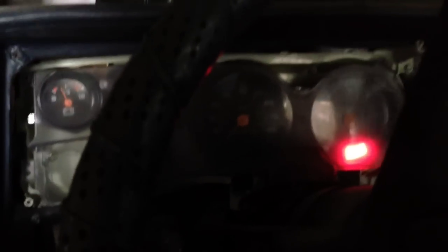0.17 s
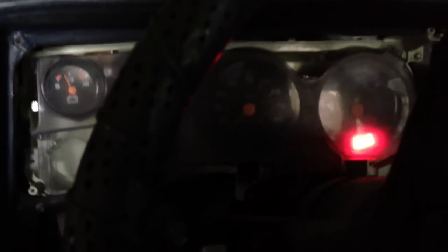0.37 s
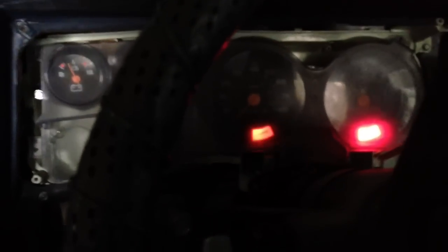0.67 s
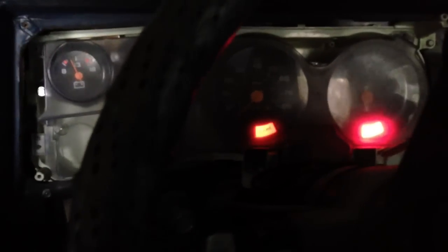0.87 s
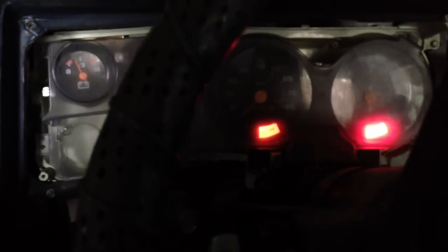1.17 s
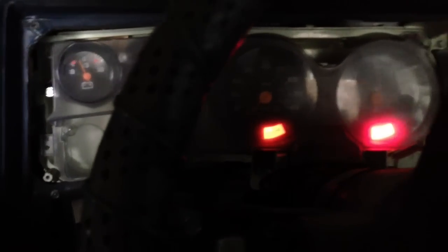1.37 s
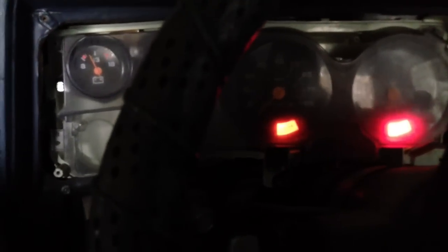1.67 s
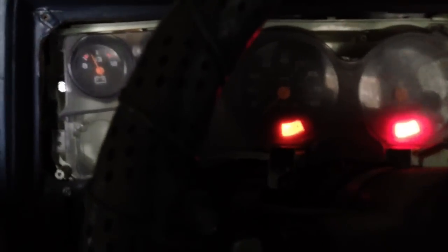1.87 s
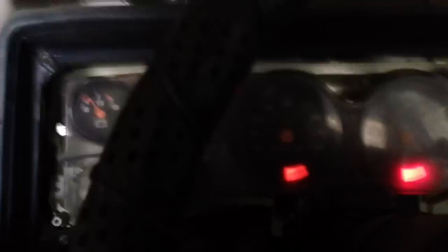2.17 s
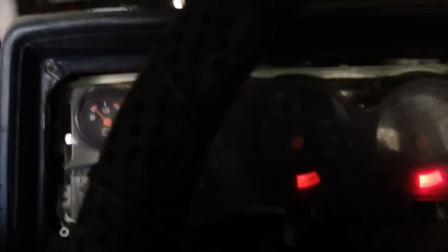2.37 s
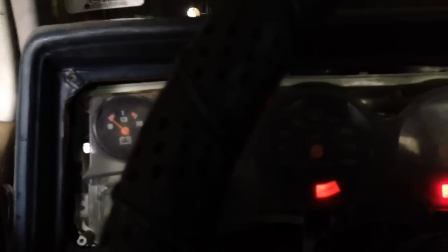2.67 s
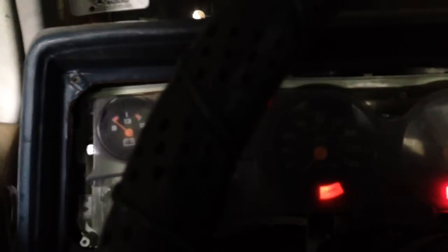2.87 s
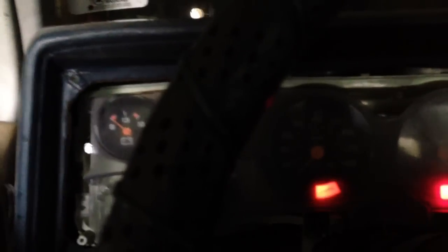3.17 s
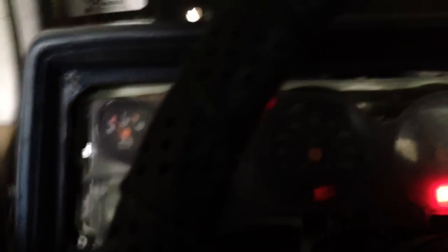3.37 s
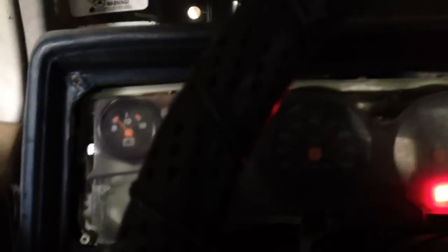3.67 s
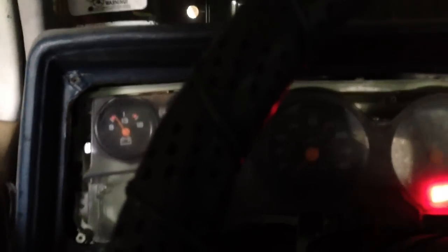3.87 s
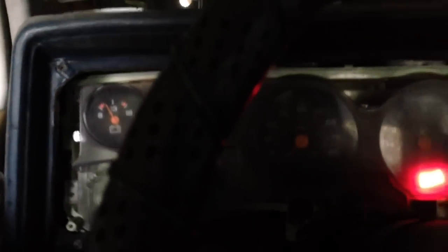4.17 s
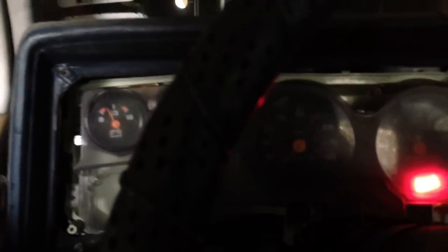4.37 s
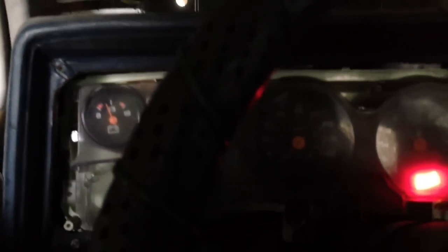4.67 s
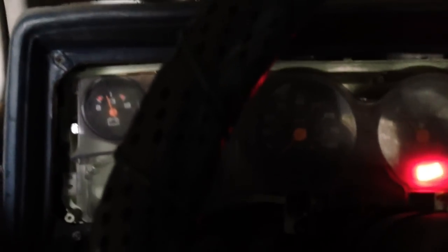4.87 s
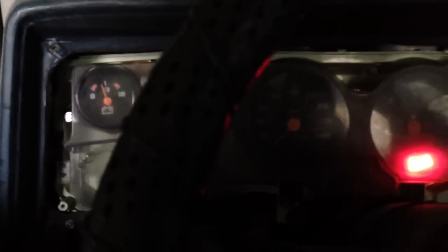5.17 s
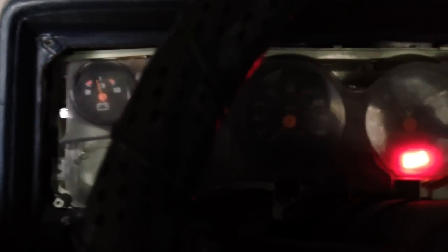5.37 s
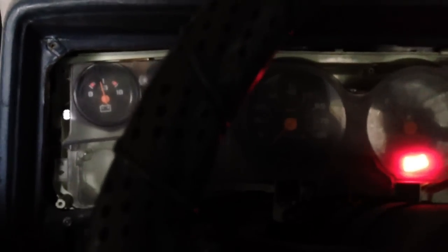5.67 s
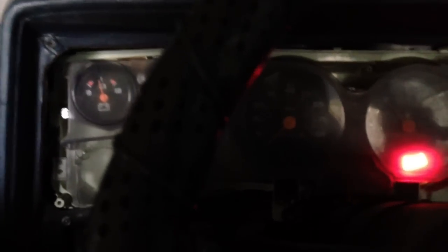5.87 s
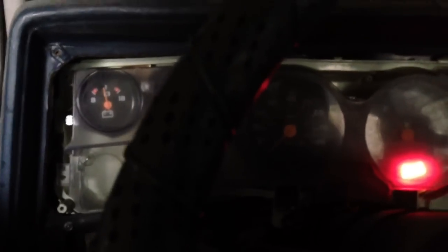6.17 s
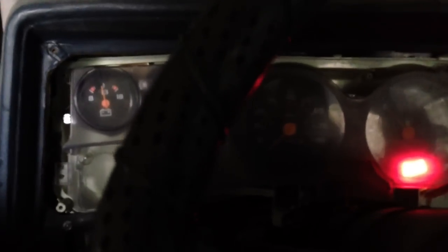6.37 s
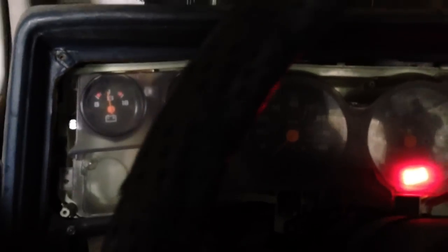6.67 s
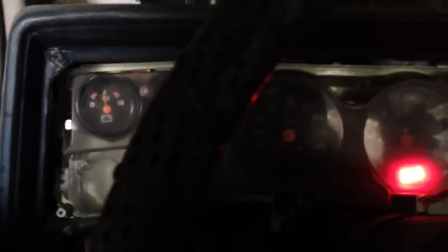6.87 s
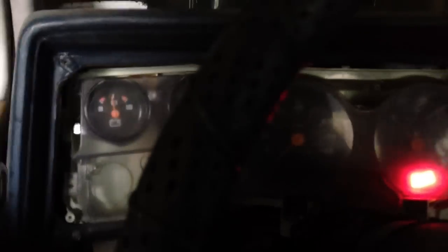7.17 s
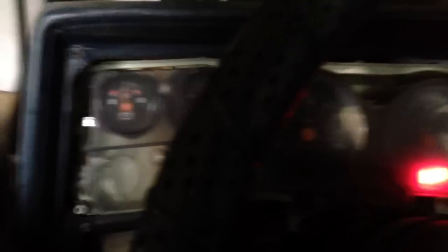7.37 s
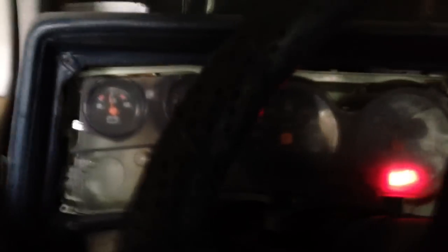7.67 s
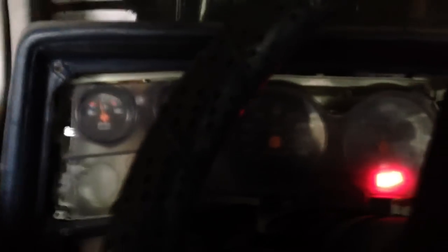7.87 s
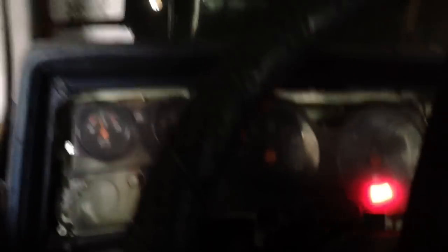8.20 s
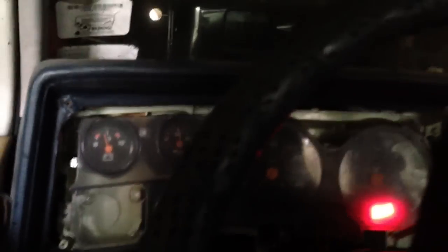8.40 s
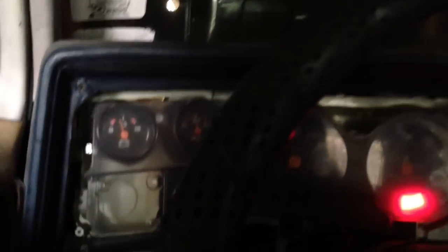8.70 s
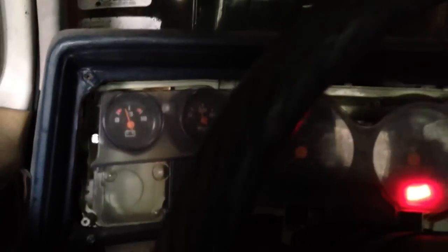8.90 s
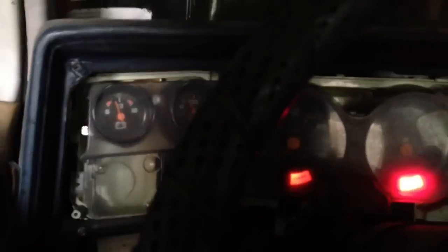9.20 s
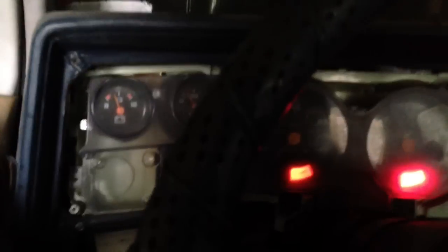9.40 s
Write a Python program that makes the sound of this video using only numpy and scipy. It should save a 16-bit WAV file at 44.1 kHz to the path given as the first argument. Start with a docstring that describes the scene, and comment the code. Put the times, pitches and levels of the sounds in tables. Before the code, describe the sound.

Close in the cabin of an old car, over a very faint low outdoor murmur. At 0.5-0.9 s a pedal linkage scrapes and raps the floor pan with a dull boom; lock clicks follow at 0.75 and 1.35 s, tiny key clinks around 1.6-1.8 s and a firmer click at 2.03 s. From 2.1 to 3.4 s the starter grinds harshly, bright metallic clashing in uneven swells over a low growl, biting again at 2.9 and 3.25 s. The V8 catches around 3.5 s with belt squeaks, then surges at about 3.8, 4.6, 5.6 and 6.1 s, booming, clattering and hissing, sagging between. It weakens; at 7.0 s it spits back with a loud bark and tinny clank. Slowing chuffs, rattles and thumps run down until about 8.3 s. Quiet returns, then a pedal scrape and knock at 8.8-9.06 s, and only murmur.

```python
"""Inside an old car: a pedal is pumped, the key clicks round and the starter grinds harshly on the ring gear.
The V8 catches, surges four times, spits back with a clank, runs down in chuffs and shudders to a stop.
The pedal is pressed once more in the quiet cabin.
Knocks, scrapes and rushing air are shaped noise and decaying tones; a running count of gear teeth drives
the starter, and a running count of firings drives the engine."""
import sys
import numpy as np
from scipy import signal
from scipy.fft import rfft, irfft, next_fast_len
from scipy.io import wavfile
from scipy.ndimage import uniform_filter1d, minimum_filter1d, map_coordinates

SR = 44100
rng = np.random.default_rng(int(sys.argv[2]) if len(sys.argv) > 2 else 0)


def master(y):
    """Save y as 16-bit WAV."""
    cut = np.clip(np.atleast_2d(y).T, -1, 1)
    pcm = np.round(cut * 32767)  # scale
    wavfile.write(sys.argv[1], SR, pcm.astype(np.int16))


N = 420713

# colour of rushing air: (frequency [Hz], level [dB])
HISS_SPECTRUM = [(2350, -22), (4000, -1), (5100, 0), (8550, -9), (12900, -12), (14700, -15), (15500, -18)]
# the engine spits back: (time [s], level [dB])
BACKFIRES = [(7.0054, -8.5)]
# stabs of the throttle:
# (fully open [s], let go [s], depth [1 = a firm stab], top speed [firings per second])
THROTTLE_STABS = [(3.74, 3.814, 1.236, 116), (4.469, 4.641, 1.006, 106), (5.501, 5.594, 1.02, 84),
                  (6.031, 6.17, 0.99, 101)]
# the engine between the stabs: (time [s], throttle opening [0-1], strength of the burn [dB])
LIGHT_FOOT = [(3.48, 0.58, -3.5), (3.7, 0.54, 2), (3.95, 0.06, -1), (4.22, 0, -1.5), (5.1, 0.17, -1),
              (5.8, .04, 0.2), (6.4, 0.34, 1.5), (6.95, 0.58, 2), (7.42, 0.62, -2.5), (7.52, 0, 3.5)]


def amp(db):
    """Turn decibels into a gain."""
    return 10 ** (np.asarray(db) / 20)


def unit(x):
    """Scale x to an average (rms) strength of 1."""
    return x / np.sqrt(np.mean(x ** 2) + 1e-20)


def clock():
    """Time of every sample, in seconds."""
    return np.arange(N) / SR


def curves(rows):
    """Join the table's points with straight lines: one curve for each column after the time."""
    times, *columns = np.transpose(rows)
    return [np.interp(clock(), times, column) for column in columns]


def gate(start, stop, rise, fall):
    """Fully on between two times, with curved ramps before and after them."""
    fade_in = np.clip(1 + (clock() - start) / rise, 0, 1) ** 2
    fade_out = np.clip(1 + (stop - clock()) / fall, 0, 1) ** 2
    return fade_in * fade_out


def wobble(rate):
    """A smooth random curve through `rate` random points a second."""
    times = np.arange(0, N / SR, 1 / (6 * rate))
    points = rng.standard_normal(int(N * rate / SR) + 4)
    return np.interp(clock(), times, map_coordinates(points, [times * rate]))


def noise():
    """White noise."""
    return rng.standard_normal(N)


def filtered(x, response):
    """Multiply the spectrum of x by a function of frequency."""
    size = next_fast_len(N + SR // 2)
    return irfft(rfft(x, size) * response(np.fft.rfftfreq(size, 1 / SR)), size)[:N]


def coloured(x, points):
    """Shape x with a (frequency [Hz], level [dB]) spectrum, then scale it to rms 1."""
    f, db = np.transpose(points)
    return unit(filtered(x, lambda hz: amp(np.interp(np.log(hz + 1), np.log(f + 1), db))))


def resonate(x, peaks):
    """Let x ring (frequency [Hz], width [Hz], level [dB]) resonances, then scale it to rms 1."""
    t = np.arange(SR // 4) / SR
    response = 0
    for hz, width, db in peaks:
        decay = np.exp(-np.pi * abs(width) * t)
        response = response + amp(db) * np.sqrt(abs(width)) * decay * np.cos(2 * np.pi * hz * t)
    return unit(signal.fftconvolve(x, np.heaviside(t, .5) * response)[:N])


def burst(rise, t60):
    """Half a second of loudness shape: a quick swell, then a decay by 60 dB every t60 seconds; peak 1."""
    t = np.arange(SR // 2) / SR
    shape = (1 - np.exp(-t / abs(rise))) * np.exp(-np.log(1000) * t / abs(t60))
    return shape / shape.max()


def ring(modes, rise):
    """A struck object's fading tones, each at a slightly random strength for every blow."""
    t = np.arange(SR // 2) / SR
    return sum(amp(db + rng.normal(0, 1.3)) * burst(rise, t60) * np.sin(2 * np.pi * hz * t)
               for hz, db, t60 in modes)


def place(sounds):
    """Add (time, sound) pairs together on one track."""
    track = np.zeros(N + SR)
    for s, sound in sounds:
        track[max(round(s * SR), 0):][:len(sound)] += sound
    return track[:N]


def strokes(turns, scatter_db):
    """One click of uneven size whenever the count of turns passes a whole number."""
    return np.diff(np.floor(turns), prepend=0) * amp(scatter_db * noise())


def patchy(x, depth_db):
    """Give x short-lived strands of extra and missing strength."""
    spectrum = signal.stft(x, nperseg=1024)[2]
    field = uniform_filter1d(rng.standard_normal(spectrum.shape), size=3, axis=0)  # blur over frequency
    field = uniform_filter1d(field, size=5, axis=1)  # blur over time
    return signal.istft(spectrum * amp(depth_db * unit(field)), nperseg=1024)[1][:N]


def squeal(hz, spread):
    """A rubbing tone whose pitch and strength stagger, at rms 1."""
    pitch = hz * (1 + spread * wobble(450))
    return unit(amp(3 * wobble(90)) * np.sin(2 * np.pi * np.cumsum(pitch / SR)))


def cabin():
    """A faint outdoor murmur of shaped noise, and a faint low hum before the engine catches."""
    # colour of the murmur: (frequency [Hz], level [dB])
    quiet_spectrum = [(18, -62.5), (30, -39), (102, -12.5), (126, -5.5), (202, 1), (230, -5.5), (315, -6),
                      (479, -21), (606, -7.5), (691, -18.5), (921, -18), (1050, -21.5), (3490, -25.5),
                      (4540, -26), (15500, -30.5)]
    murmur = amp(-57.0 + 0.99 * wobble(13)) * coloured(noise(), quiet_spectrum)
    hum_hz = 137 + 1.3 * wobble(7.0)
    hum = gate(0.74, 3.1, rise=.2, fall=0.045) * np.sin(2 * np.pi * np.cumsum(hum_hz) / SR)
    return murmur + amp(-58.5) * hum


def jingle():
    """Spare keys on the ring touch, and their metal rings in tiny clinks."""
    # the keys touch: (time [s], level [dB])
    touches = [(1.582, -44), (1.634, -48.5), (1.687, -48.5), (1.79, -55)]
    # tones of a spare key: (frequency [Hz], level [dB], 60 dB decay time [s])
    key_modes = [(3160, -4, 0.044), (3250, -11, .05), (6100, -8, 0.063), (8600, -6, 0.1), (9900, -8, 0.054),
                 (12200, -7, .07), (15100, -4, .06)]
    return place((s, amp(db) * ring(key_modes, rise=0.0016)) for s, db in touches)


def key():
    """Small lock parts slide and snap as clicks of noise, and ring the metal lock barrel."""
    # key and lock clicks: (time [s], level [dB], barrel ring relative to the click's level [dB])
    clicks = [(0.753, -26.5, -22), (1.3506, -29, -13), (1.4168, -41.5, -4.5), (1.584, -46, -28),
              (1.6372, -47, -20), (1.69, -36, -2), (1.977, -41.5, -12), (1.9984, -43, 7), (2.034, -20, -10),
              (2.0524, -44.5, -16)]
    # colour of a click: (frequency [Hz], level [dB])
    click_spectrum = [(530, -22), (900, -9.5), (1370, -6), (2820, -7.5), (4550, -5.5), (6050, -12),
                      (13300, -15.5), (14800, -25), (15500, -29)]
    # tones of the lock barrel: (frequency [Hz], level [dB], 60 dB decay time [s])
    barrel_modes = [(775, 6, .07), (710, -3, .06), (1000, -4, .04), (2420, -6, 0.067), (6045, -26, .07)]
    slide = place((s - .012, amp(db - 27) * burst(0.01, 0.13)) for s, db, ring_db in clicks)
    snap_shape = burst(0.00071, 0.019) + amp(-16.5) * burst(0.0026, .1)  # a sharp tick and a faint tail
    snap = place((s, amp(db - 8) * snap_shape) for s, db, ring_db in clicks)
    barrel = place((s, amp(db + ring_db - 5.5) * ring(barrel_modes, rise=0.00066))
                   for s, db, ring_db in clicks)
    return (slide + snap) * coloured(patchy(noise(), depth_db=-2.0), click_spectrum) + barrel


def pedal():
    """The linkage takes up its slack and scrapes; the arm raps the floor pan, which booms on for a moment."""
    # linkage scrapes: (time [s], level [dB], hiss relative to that level [dB], 60 dB decay time [s])
    scrapes = [(0.482, -27.5, -37, 0.1), (.777, -24, -17, 0.11), (.792, -41, -25, 0.28),
               (0.902, -35, -19.5, 0.053), (8.82, -32, -20, 0.091), (8.94, -23, -17.5, 0.14),
               (9.057, -35.5, -22.5, 0.04)]
    # colour of a scrape: (frequency [Hz], level [dB])
    scrape_spectrum = [(100, -45), (300, -8), (700, 7.5), (1200, -10), (1900, 1), (2800, 0), (4500, -7),
                       (6500, -27), (15000, -49)]
    # the pedal meets the floor: (time [s], thud level [dB], rap level [dB])
    landings = [(0.494, -37, -61), (0.794, -26.5, -27.5), (0.903, -49, -41), (8.96, -31, -27),
                (9.059, -46, -49)]
    # colour of the floor pan's thud: (frequency [Hz], level [dB])
    floor_spectrum = [(30, -65), (60, -27), (110, -11.5), (185, 9.5), (290, -2.5), (380, -5), (700, -49)]
    # resonances of the pedal arm: (frequency [Hz], width [Hz], level [dB])
    arm_peaks = [(376, 31, -4), (474, 25, 12), (592, 28, 4), (690, 41, -8), (1040, 150, -26)]
    thud_t60_s, rap_t60_s = .27, .18
    scrape = place((s, amp(db - 9.5) * burst(0.0034, t60)) for s, db, hiss_db, t60 in scrapes)
    slack = place((s - .012, amp(db - 21) * burst(0.011, 0.12)) for s, db, hiss_db, t60 in scrapes)
    hiss = place((s, amp(db + hiss_db - 5.0) * burst(.003, t60)) for s, db, hiss_db, t60 in scrapes)
    thud = place((s, amp(db) * burst(0.0037, thud_t60_s)) for s, db, rap_db in landings)
    rap = place((s, amp(rap_db) * burst(.004, rap_t60_s)) for s, db, rap_db in landings)
    linkage = (scrape + slack) * coloured(patchy(noise(), depth_db=3.0), scrape_spectrum)
    linkage = linkage + hiss * coloured(noise(), HISS_SPECTRUM)
    return linkage + thud * coloured(noise(), floor_spectrum) + rap * resonate(noise(), arm_peaks)


def chirps():
    """The belt slips on its pulley and rubs out short, unsteady squeaks."""
    # the belt slips: (start [s], end [s], pitch [Hz], level [dB])
    slips = [(3.55, 3.574, 2290, -31), (3.68, 3.798, 2276, -26.5), (3.753, 3.859, 2810, -23.5),
             (6.187, 6.283, 2160, -33), (7.329, 7.369, 2580, -31), (7.41, 7.459, 2410, -32.5),
             (7.831, 7.852, 2240, -33)]
    return sum(amp(db) * gate(start, stop, rise=0.051, fall=0.024) * squeal(hz, spread=0.031)
               for start, stop, hz, db in slips)


def kicks():
    """Jolts, misfires and the final shudder make the body boom briefly: a fading low tone with dull noise."""
    # dull thumps through the body: (time [s], level [dB], pitch [Hz], 60 dB decay time [s])
    thumps = [(0.0, -29, 168, 0.18), (2.757, -21.5, 329, 0.099), (2.807, -21.5, 289, .09),
              (3.058, -27, 331.4, 0.087), (4.46, -19, 152, .1), (4.618, -15, 153, .05),
              (4.685, -14.5, 165, 0.03), (5.505, -15.5, 149, 0.125), (7.024, -9.5, 190.7, 0.1),
              (7.109, -11, 175.5, 0.053), (7.602, -23, 270, 0.31), (7.647, -17, 219, 0.17),
              (7.838, -24, 266, 0.23), (7.874, -17, 279, 0.18), (7.96, -18, 202, .28),
              (8.106, -23, 170, 0.14), (8.303, -15, 196.5, .25), (8.785, -35.5, 134, 0.19)]
    rise_s = 0.0057
    shake_spectrum = [(30, -53.5), (65, -22.5), (125, 1.5), (280, 3.5), (380, -14.5), (700, -18),
                      (2000, -25.5), (6000, -51.5)]  # (frequency [Hz], level [dB])
    thuds = place((s, amp(db) * ring([(hz, 0, t60)], rise_s)) for s, db, hz, t60 in thumps)
    shake = amp(-9.5) * place((s, amp(db) * burst(rise_s, t60)) for s, db, hz, t60 in thumps)
    return thuds + shake * coloured(noise(), shake_spectrum)


def chuffs():
    """The intake gasps twice as the throttle is stabbed once more, then the coasting cylinders let their air go
    one by one; each puff of hiss is joined by a loose rattle."""
    # two gasps at the intake, then the last compressions: (time [s], rattle level [dB], hiss level [dB], 60 dB
    # decay time [s])
    compressions = [(7.325, -41, -33, 0.3), (7.385, -47, -35, 0.19), (7.541, -35.5, -33.5, 0.41),
                    (7.605, -33, -32.5, 0.27), (7.651, -33.5, -56.5, 0.22), (7.803, -37, -36.5, 0.45),
                    (7.873, -30.5, -29.5, .23), (7.968, -34.5, -63.5, .2), (8.041, -37, -61, .12),
                    (8.106, -34.5, -43, 0.11), (8.18, -36, -55.5, 0.1), (8.25, -34, -51, 0.13),
                    (8.305, -42.5, -65.5, .14)]
    # colour of the rattle: (frequency [Hz], level [dB])
    rattle_spectrum = [(100, -40), (450, 0.5), (700, 3), (860, -6.5), (1050, -2.5), (1500, -6),
                       (2500, -1.5), (4000, -16), (6000, -21), (11000, -48.5)]
    rattle_rise_s, air_rise_s = .004, 0.0028
    body = place((s, amp(db) * (burst(rattle_rise_s, t60) + amp(-14.5) * burst(0.065, 0.35)))
                 for s, db, hiss_db, t60 in compressions)
    air = place((s, amp(hiss_db) * burst(air_rise_s, t60)) for s, db, hiss_db, t60 in compressions)
    rattle = body * coloured(patchy(noise(), depth_db=5.5), rattle_spectrum)
    return rattle + air * coloured(noise(), HISS_SPECTRUM)


def backfire():
    """A spit through the carburettor rings the air cleaner's tin lid, which lifts and lands once more."""
    # colour of the blast: (frequency [Hz], level [dB])
    bark_spectrum = [(180, -31.5), (300, -10.5), (700, -1.5), (970, -14), (1260, -6), (1550, -10),
                     (2000, -2.5), (2350, -17), (3000, -5.5), (4100, -16), (5000, -25), (10000, -46),
                     (15000, -67)]
    # tones of the lid: (frequency [Hz], level [dB], 60 dB decay time [s])
    lid_modes = [(1994, 6, 0.13), (1960, -8, .17), (3100, -0.5, 0.033), (2610, -13, 0.068)]
    blast = place((s, amp(db - 3.5) * burst(.006, 0.16)) for s, db in BACKFIRES)
    lid = place((s + 0.014, amp(db - 10.5) * ring(lid_modes, rise=0.016)) for s, db in BACKFIRES)
    # the landing rings only the first tone, and fades faster
    landing = place((s + 0.073, amp(db - 17.0) * ring(lid_modes[:1], rise=0.0072) * burst(0.0065, 0.17))
                    for s, db in BACKFIRES)
    return blast * coloured(noise(), bark_spectrum) + lid + landing


def starter():
    """Pinion teeth skid and hammer on the ring gear, which rings; the motor growls under the load."""
    # average rate at which the pinion teeth strike: (time [s], rate [Hz])
    tooth_rate = [(2.12, 272.8), (2.2, 180.4), (2.3, 217.7), (2.39, 260.6), (2.47, 177.4), (2.56, 178.8),
                  (2.68, 226), (2.8, 302), (3.2, 220)]
    # the pinion bites anew: (time [s], level [dB], 60 dB decay time [s])
    bite_times = [(2.109, -44, .15), (2.131, -32.5, 0.48), (2.8837, -7.5, 0.23), (3.254, -9.5, 0.2)]
    # ring gear resonances: (frequency [Hz], level [dB])
    gear_modes = [(1357, -41), (1604, -49), (1744, -34), (1922, -33), (2056, -39), (2207, -38.5),
                  (2681, -30.5), (2972, -42.5), (3235, -35.5), (3418, -41), (3747, -33.5), (4587, -34.5),
                  (4947, -37.5), (5270, -41.5), (5706, -36), (6385, -42), (6589, -43), (6858, -39.5),
                  (6993, -42)]
    # colours of the skidding teeth and of the motor's growl: (frequency [Hz], level [dB])
    clash_spectrum = [(40, -60), (150, -34), (450, -10.5), (700, -10), (1200, -6.5), (1800, 0), (2600, 1.5),
                      (3500, 0), (5500, 0), (6800, -6.5), (8500, -12.5), (11000, -15), (13000, -25),
                      (15500, -34.5)]
    growl_spectrum = [(25, -58.5), (60, -49.5), (110, -20), (180, 3), (310, -3.5), (400, -11), (500, 1),
                      (650, -23.5), (1200, -35.5)]
    # each compression loads the starter in a bell-shaped swell:
    # (peak time [s], gear clash level [dB], growl level [dB], standard deviation of the bell [s])
    loads = [(2.225, -12.5, -34.5, 0.11), (2.42, -11.5, -34.5, 0.11), (2.62, -11, -32, .06),
             (2.785, -11, -36, 0.055), (3.025, -11, -33.5, 0.047), (3.165, -20.5, -44, .02),
             (3.37, -19.5, -35.5, .035)]
    moan_db, moan_hz, moan_width_hz = -29.5, 177, 69  # the moan is loudest where the body resonates

    swells = [(np.exp(-.5 * ((clock() - s) / width) ** 2), clash_db, growl_db)
              for s, clash_db, growl_db, width in loads]
    # swells add as powers over a steady floor
    clash = np.sqrt(sum((amp(clash_db) * swell) ** 2 for swell, clash_db, growl_db in swells) + amp(-27) ** 2)
    strain = np.sqrt(sum((amp(growl_db) * swell) ** 2 for swell, clash_db, growl_db in swells)
                     + amp(-42.5) ** 2)
    strikes_hz = curves(tooth_rate)[0]
    turns = np.cumsum(strikes_hz * amp(.5 * wobble(130))) / SR  # one turn per tooth
    teeth = unit(strokes(turns, scatter_db=1.0))
    landing = np.exp(-(turns % 1) / 0.8)  # each tooth scrapes as it lands
    grind = unit(noise() * (2.4 + landing) * amp(1.4 * wobble(70)))
    on = gate(2.135, 3.41, rise=0.021, fall=.06)
    bites = place((s, amp(db) * burst(0.013, t60)) for s, db, t60 in bite_times)
    skid = coloured(patchy(grind, depth_db=3.0), clash_spectrum)  # the point of contact keeps moving
    gear = resonate(noise() + .4 * teeth, [(hz, 27, db) for hz, db in gear_modes])
    loaded = gate(2.15, 2.68, rise=0.064, fall=.3)  # the motor moans until the engine starts to help it round
    body = amp(moan_db) / np.hypot(1, 2 * (strikes_hz - moan_hz) / moan_width_hz)
    moan = loaded * body * unit(amp(2.5 * wobble(45)) * np.sin(2 * np.pi * turns))
    growl = (on * strain + amp(-24) * bites) * coloured(.5 * teeth + noise(), growl_spectrum)
    return (on * clash + bites) * (amp(-2.03) * skid + amp(-7.5) * gear) + growl + moan


def throttle():
    """How far the throttle stands open: quick stabs over a light foot."""
    open_s, close_s = 0.22, 0.14  # time taken to open and to close
    resting = curves(LIGHT_FOOT)[0]
    opening = resting
    for start, stop, depth, top in THROTTLE_STABS:
        ramp = np.interp(clock(), [start - open_s, start, stop, stop + close_s], [0, 1, 1, 0])
        opening = opening + ramp * (depth - resting)
    return opening


def speed():
    """Firings per second: each stab lifts the speed, which sags until the next one and at last runs down."""
    # the engine fades and stalls: (time [s], speed [firings per second])
    stall = [(6.419, 88.6), (6.8, 76), (7.0, 76), (7.12, 66.6), (7.402, 48), (8.0, 16.4)]
    sag_rate = 61  # firings per second before a stab
    pickup_s, carry_s = .115, .06  # speed picks up before full throttle and holds on after it
    turning = []
    for start, stop, depth, top in THROTTLE_STABS:
        turning += [(start - pickup_s, sag_rate), (stop, top), (stop + carry_s, top)]
    # the time between firings, not their rate, changes in straight lines
    return 1 / curves([(s, 1 / rate) for s, rate in turning + stall])[0]


def engine():
    """Uneven firings boom in the cabin, thud through the exhaust and rattle the valve gear; the intake hisses."""
    # strength of each firing round the firing order: one value per cylinder [dB]
    cylinder_db = [1, -1, -4.5, 1, 3, 0, 1.5, -2]
    # colours of the exhaust and of the valve gear: (frequency [Hz], level [dB])
    exhaust_spectrum = [(59, -42), (100, -24.5), (118, -5), (160, 2.5), (204, 1.5), (242, -4.5),
                        (343, -5.5), (392, -16), (459, -6), (512, -11.5), (810, -17), (903, -14),
                        (1070, -21), (1250, -24), (1800, -17), (2340, -50.5), (3960, -120)]
    clatter_spectrum = [(710, -31.5), (1200, -3.5), (1430, -5), (1570, -1.5), (2020, 3), (2240, 4.5),
                        (2420, 5.5), (2760, 3), (2910, -2), (3080, -4), (3270, -3), (5070, -11),
                        (9000, -48), (11700, -45.5), (19800, -120)]
    # resonances of the bulkhead: (frequency [Hz], width [Hz], level [dB])
    bulkhead_peaks = [(451, 13, 2), (933, 30, -6), (1064, 12, -5.5)]
    # the cabin's answer to the firing tone: (firing rate [Hz], level [dB])
    cabin_boom = [(50, -5), (62, -15.5), (73, 0), (82, -1), (92, -5), (112, -13)]
    # tones above the firing tone: (multiple of the firing rate, level relative to the exhaust [dB])
    tone_multiples = [(1.5, -18), (2, -7), (2.5, -10), (4, -15)]
    firing_spectrum = [(60, -4.5), (350, -9.5), (700, 1.5), (1500, -18.5)]  # (frequency [Hz], level [dB])
    rumble_spectrum = [(15, -28.5), (30, -14.5), (50, -12.5), (75, 4.5), (110, -0.5), (160, -11),
                       (400, -58.0)]  # (frequency [Hz], level [dB])
    lag_s = 0.022  # the engine answers the throttle a little later
    belt_hz, belt_hz_per_firing, belt_drift_hz = 2040, 5, 140  # the rasp rises with engine speed and drifts

    rate, opening, burn_db = speed(), throttle(), curves(LIGHT_FOOT)[1]
    load = np.interp(clock() - lag_s, clock(), opening)
    # a backfire shakes the whole engine
    spit = sum(gate(s + .015, s + .1, rise=.02, fall=0.36) for s, db in BACKFIRES)
    # each voice starts from its level with the throttle shut and gains with the throttle
    boom_db = -39 + 15 * np.minimum(load, 1) + 1.5 * burn_db + np.interp(rate, *np.transpose(cabin_boom))
    exhaust_db = -35.5 + 11 * load + burn_db + 10.5 * spit
    clatter_db = -42 + 14 * load + 5 * spit
    hiss_db = -48 + 16 * opening

    turns = np.cumsum(rate * amp(.08 * wobble(40))) / SR  # one turn per firing
    cylinder = amp(np.take(cylinder_db, turns.astype(int) % len(cylinder_db)))
    puff = unit(cylinder * np.exp(-(turns % 1) / .5))  # gas leaves in one puff per firing
    running = gate(3.6, 7.1, rise=0.12, fall=0.12)
    firings = running * coloured(cylinder * strokes(turns, scatter_db=4.5), firing_spectrum)
    tone = amp(1.2 * wobble(25)) * running * unit(np.sin(2 * np.pi * turns))
    overtones = running * sum(amp(db + 1.6 * wobble(12)) * np.sin(2 * np.pi * k * turns)
                              for k, db in tone_multiples)

    rumble = coloured(noise(), rumble_spectrum)
    boom = amp(boom_db) * tone + (amp(boom_db - 14) + amp(exhaust_db - 16)) * rumble
    gas = 0.11 * firings + noise() * (0.56 + 0.5 * puff)
    bulkhead = amp(-8.0) * resonate(noise() * (.5 + puff), bulkhead_peaks)
    exhaust = amp(exhaust_db) * (coloured(gas, exhaust_spectrum) + overtones + bulkhead)

    # the valve gear rattles with every firing, every other one a little harder
    rattle = (2 + puff) * amp(.3 * np.sin(np.pi * turns))
    valve_gear = coloured(patchy(noise(), depth_db=4) * rattle, clatter_spectrum)
    clatter = amp(clatter_db + 0.83 * wobble(35)) * valve_gear
    rasp_hz = belt_hz + belt_hz_per_firing * rate + belt_drift_hz * wobble(9)
    rasp = amp(clatter_db - 7) * squeal(rasp_hz, spread=.04)
    hiss = amp(hiss_db) * coloured(noise() * (6.6 + puff), HISS_SPECTRUM)

    coast = np.clip(clock() - 7.45, 0, None)  # seconds since the engine began to coast
    low = amp(-15 * coast) * (boom + exhaust)
    high = amp(-45 * coast) * (clatter + rasp + hiss)  # the treble goes first
    return gate(3.44, 8.4, rise=0.079, fall=0.024) * (low + high)


def scene():
    """Add up everything as heard from the driver's seat."""
    quiet_sounds = cabin() + jingle() + key() + pedal()
    engine_knocks = chirps() + kicks() + chuffs() + backfire()
    return (quiet_sounds + engine_knocks + starter() + engine())[None]


def record(dry):
    """A fast limiter turns down the highest peaks, then everything above the band limit is removed."""
    top_hz = 15650
    needed = 1 / np.maximum(1, np.abs(dry[0]))
    gain = uniform_filter1d(minimum_filter1d(needed, size=161), size=161)  # sizes in samples
    return filtered(dry[0] * gain, lambda hz: hz < top_hz)[None]


dry = scene()
out = record(dry)
master(out)
```